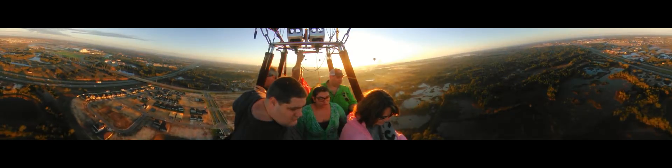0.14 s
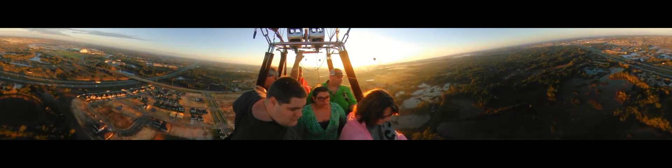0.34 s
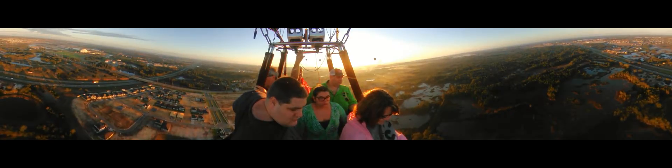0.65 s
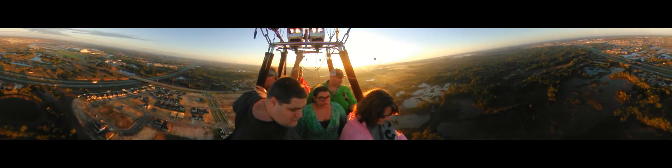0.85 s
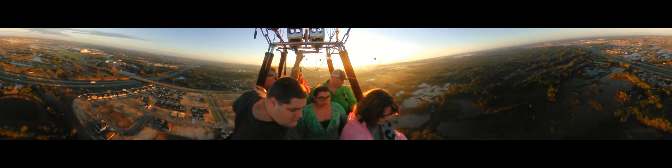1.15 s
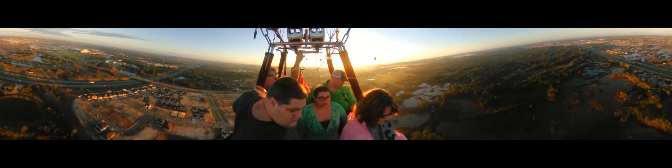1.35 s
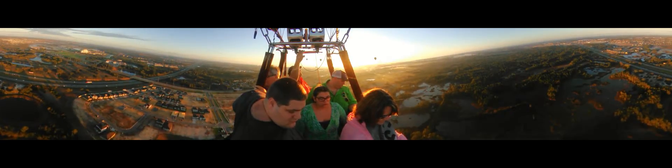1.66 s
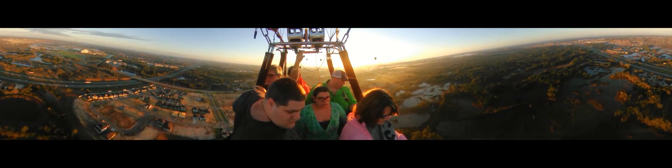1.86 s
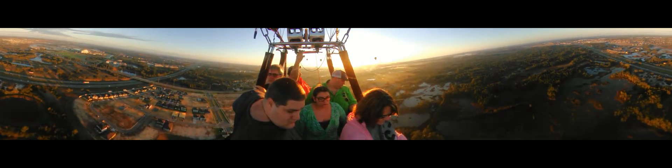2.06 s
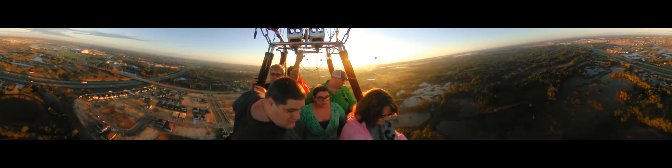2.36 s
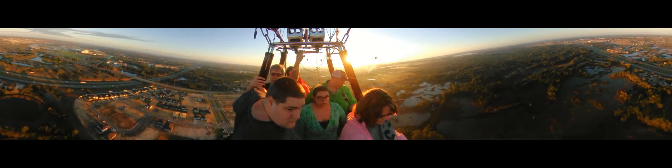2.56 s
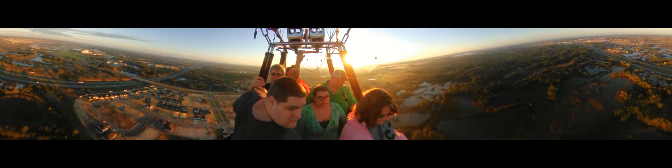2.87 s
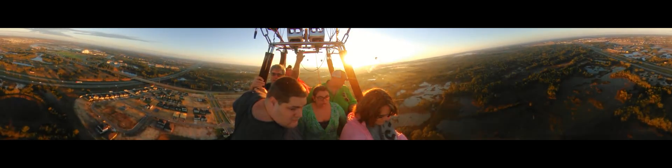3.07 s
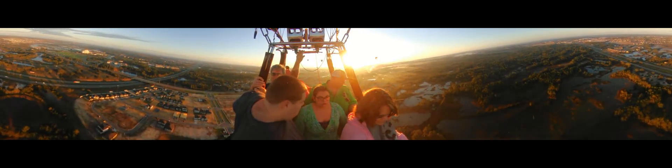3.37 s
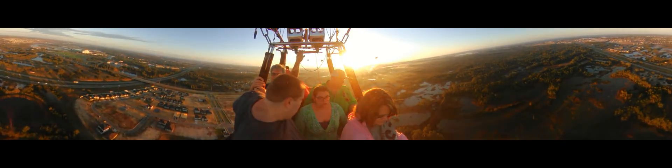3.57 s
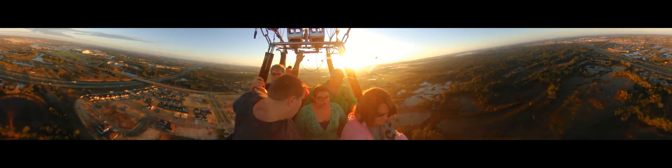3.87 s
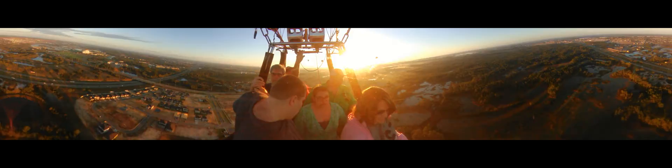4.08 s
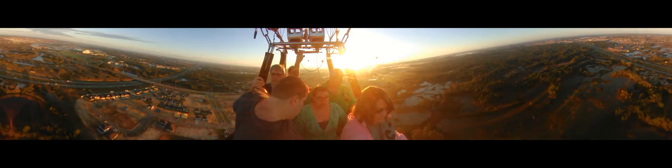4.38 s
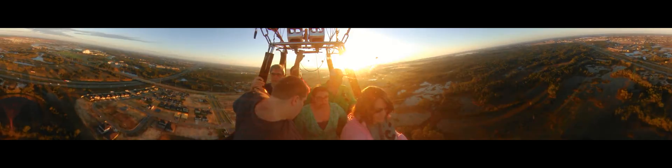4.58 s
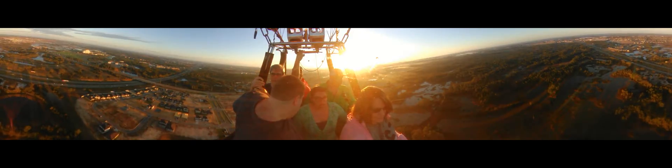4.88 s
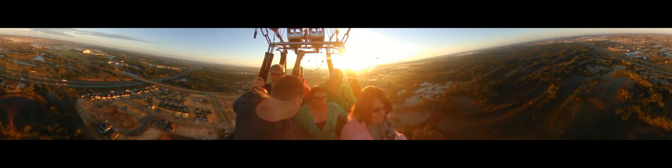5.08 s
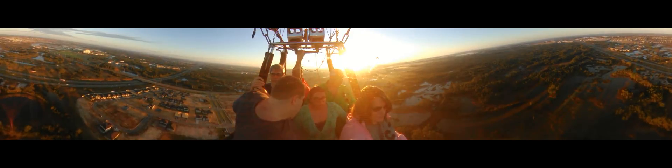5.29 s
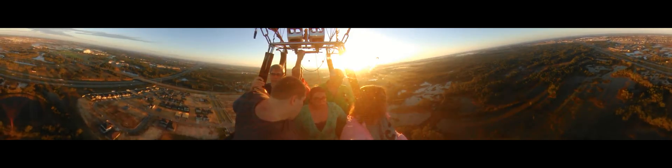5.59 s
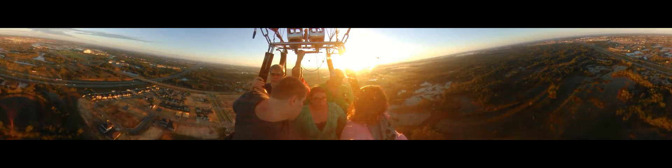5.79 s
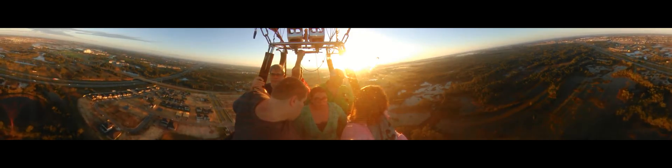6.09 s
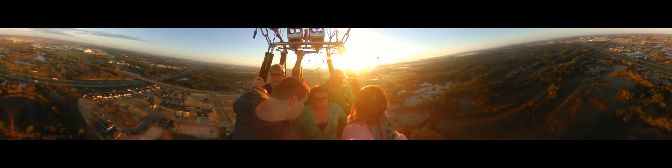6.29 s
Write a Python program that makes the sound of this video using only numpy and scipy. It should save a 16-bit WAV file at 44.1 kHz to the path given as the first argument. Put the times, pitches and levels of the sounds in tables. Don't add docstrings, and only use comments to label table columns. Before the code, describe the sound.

Outdoors in a balloon basket, a hissing burner blast stops, quiet flame and metallic bumps follow, then the burner reignites with a thump and overloading roar.

```python
import sys
import numpy as np
from scipy import signal
from scipy.fft import rfft, irfft
from scipy.io import wavfile
from scipy.ndimage import uniform_filter1d

SR = 44100
rng = np.random.default_rng(int(sys.argv[2]) if len(sys.argv) > 2 else 0)


def volts_from_decibels(level):
    exponent = np.asarray(level, float) / 20
    return 10 ** exponent


def dump_mix(stems):
    frames = np.atleast_2d(stems).T
    limited = np.clip(frames, -1, 1)
    pcm = np.round(limited * 32767).astype(np.int16)
    wavfile.write(sys.argv[1], SR, pcm)


N = 284004
T = np.arange(N) / SR
HZ = np.maximum(np.fft.rfftfreq(N, 1 / SR), 1)


def unit(x):
    return x / np.sqrt(np.mean(x ** 2))


def along(table, hz, column):
    table = np.array(table)
    return np.interp(np.log(hz), np.log(table[:, 0]), table[:, column])


def walk(rate):
    hold = int(SR / rate)
    steps = np.repeat(rng.standard_normal(N // hold + 1), hold)
    smooth = uniform_filter1d(uniform_filter1d(steps, hold), hold)
    return unit(smooth[:N])


def ring(modes, push, size):
    t = np.arange(size) / SR
    swell = 1 - np.exp(-(t / push) ** 2)
    total = np.zeros(size)
    for hz, db, t60 in modes:
        decay = np.exp(-np.log(1000) * t / t60)
        total += volts_from_decibels(db) * np.sin(2 * np.pi * (hz * t + rng.random())) * decay
    return swell * total


def add(out, sound, at_s):
    i = int(at_s * SR)
    n = min(sound.shape[-1], N - i)
    out[..., i:i + n] += sound[..., :n]


# frequency in Hz, lag of the right port in radians.
PORT_LAG = [(60, .02), (400, .1), (1700, .6), (4050, .6), (4500, 1.55), (6500, 1.6), (7300, 2.5),
            (8700, 2.4), (9400, 3.0), (14000, 3.2)]


def flame(colour, peaks, ports, registers_db, edges_hz, shared_db, own_db, eddy_db, eddy_rate):
    db = along(colour, HZ, 1)
    for peak_hz, width_hz, gain_db in peaks:
        db = db + gain_db / (1 + (2 * (HZ - peak_hz) / width_hz) ** 2)
    like = np.clip(along(ports, HZ, 1), 0, 1)
    lean = volts_from_decibels(along(ports, HZ, 2) / 2)
    mid, side = (rfft(rng.standard_normal(N)) * volts_from_decibels(db) * np.sqrt(1 + s * like) for s in (1, -1))

    late = np.exp(-1j * along(PORT_LAG, HZ, 1))
    pair = np.array([(mid + side) * lean, (mid - side) / lean * late])

    swell, flutter = walk(4.27), walk(eddy_rate)
    groups = np.zeros((len(registers_db), 2, N))
    for octave in np.arange(4.5, 14.1, .5):
        share = np.cos(np.pi * np.clip(np.log2(HZ) - octave, -.5, .5)) ** 2
        wobble_db = shared_db * swell + own_db * walk(12) + eddy_db * flutter
        register = np.searchsorted(edges_hz, 2 ** octave)
        groups[register] += irfft(pair * share, N) * volts_from_decibels(wobble_db)
    return sum(unit(group) * volts_from_decibels(level_db) for group, level_db in zip(groups, registers_db))


# time in seconds, swell in dB.
PILOT = [
    (.9, 1),
    (1.9, -.5),
    (2.5, -.5),
    (3.6, 2),
    (4.3, 3.5),
    (4.8, 5),
]
# frequency in Hz, level in dB per Hz.
PILOT_COLOUR = [(15, -52.5), (25, -38), (43, -5.5), (137, -3.5), (233, -8.5), (266, -7), (418, -7),
                (503, -8), (711, -8), (1710, -18.5), (2060, -21), (2480, -21), (4000, -23.5), (5070, -46),
                (14300, -55.5)]
# frequency in Hz, width in Hz, gain in dB.
PILOT_PEAKS = [(93, 48, 4), (815, 340, 2.5), (1770, 150, -4.5), (2040, 120, 6.5), (2610, 130, -5.5),
               (3680, 130, 4.5), (3760, 90, -9), (3900, 140, 2.5), (4500, 200, -0.5), (5160, 580, 6),
               (7400, 700, 3)]
# frequency in Hz, likeness from 0 to 1, left minus right in dB.
PILOT_PORTS = [(60, 0.92, 1), (151, 1, 0), (350, 0.42, 2.8), (700, 0.94, 1.2), (1080, 0.066, 0.3),
               (2300, 0.35, 3), (3800, 0.75, 1), (4500, 0.44, -1), (6500, 0.6, 2), (7300, .5, 1.5),
               (9000, 0.11, 2)]
# level in dB, share of the swell from 0 to 1.
PILOT_LAYERS = [
    (-43, 0.86),
    (-54.5, 0.82),
    (-68, 0.9),
]


def pilot():
    swell_db = np.interp(T, *np.transpose(PILOT))
    registers_db = [db + share * swell_db for db, share in PILOT_LAYERS]
    return flame(PILOT_COLOUR, PILOT_PEAKS, PILOT_PORTS, registers_db, (1300, 4600),
                 shared_db=.25, own_db=.7, eddy_db=.6, eddy_rate=90)


# start in seconds, ring in dB, low ring in dB against the ring,
# pitch of the struck bar in Hz, tick in dB against the ring.
KNOCKS = [(0.954, -65, -10, 330, 4), (1.257, -54, -8, 330, -3), (1.369, -55, -11.5, 340, -15),
          (1.551, -56, 1, 330, -9), (1.973, -58, -13, 330, -9), (2.275, -45.5, -1, 324, -20),
          (2.42, -49, -7, 270, -20), (2.655, -47, -1, 328, -19), (2.82, -45.5, 0, 268, -16),
          (2.905, -45, -2, 388, -12), (3.081, -63, -8, 350, -17), (3.26, -47, 4, 350, -11),
          (3.353, -53, -10, 480, -1), (3.476, -47.5, 2, 294, -9), (3.636, -52, -11, 400, -4),
          (3.818, -41.5, 6.5, 350, -9), (4.036, -67, -7.5, 450, 9), (4.128, -42, 1.5, 300, -13),
          (4.477, -36.5, -5, 395, -10), (4.741, -39, 2.5, 416, -14)]
# frequency in Hz, level in dB, time to fall 60 dB in seconds.
FRAME_LOW = [(127, 0, .6), (120, -7, .3), (154, -5, .4)]
# frequency in Hz, level in dB, time to fall 60 dB in seconds.
FRAME_HIGH = [(253, 10, 0.19), (268, -1, 0.57), (292, -12, 0.14), (324.4, 9, 0.27), (357, 2, 0.41),
              (421, 16, 0.093), (450, 4, 0.39), (480, 7, 0.27), (516, -7.5, 0.22)]
# frequency in Hz, level in dB, time to fall 60 dB in seconds.
BASKET = [(88, 0, 1.1), (110, -4, .35)]
# start in seconds, frequency in Hz, level in dB, time to fall 60 dB in seconds.
CLINKS = [(2.275, 316, -39, 0.49), (2.66, 327, -50, 0.45), (2.9, 331, -51, 0.31), (2.83, 268, -46, 0.55),
          (3.1, 349, -47.5, .6), (3.265, 268, -44, 0.67), (3.268, 357, -50, 0.58),
          (3.82, 1120, -46.5, 0.21), (3.83, 850, -42, .2), (3.86, 268, -36.5, 0.73),
          (4.14, 450, -41.5, 0.45), (4.26, 88, -42, 1.4)]
# start in seconds, frequency in Hz, level in dB, time to fall 60 dB in seconds.
PINGS = [
    (2.904, 8200, -62, .07),
    (2.908, 8480, -66, .06),
    (3.27, 8250, -62, .07),
    (3.272, 7980, -67, .06),
    (3.355, 2940, -54, .07),
    (4.755, 3090, -49, .1),
    (4.76, 3200, -52, .07),
    (4.765, 2990, -53, .06),
]
# frequency in Hz, share from 0 to 1.
RING_RIGHT = [(90, .87), (260, .15), (460, .1), (850, .6), (9000, .6)]
PUSH_S, HARDER_PER_DB = .017, 0.5
RISE_SHARE = 0.028


def knocks():
    out, size = np.zeros((2, N)), SR // 2
    t = np.arange(size) / SR
    dull = signal.butter(2, (700, 4300), "band", fs=SR, output="sos")
    wicker = signal.butter(2, (230, 950), "band", fs=SR, output="sos")
    for at, db, low_db, near_hz, tick_db in KNOCKS:
        push = PUSH_S * np.exp(-HARDER_PER_DB * max(tick_db, 0))

        near_bars = [(hz, g - 16 * abs(np.log2(hz / near_hz)), t60) for hz, g, t60 in FRAME_HIGH]
        thin = ring(near_bars, 1.0 * push, size)
        heavy = volts_from_decibels(low_db) * ring(FRAME_LOW, 1.44 * push, size)
        boom = volts_from_decibels(low_db - 4.5) * ring(BASKET, 1.2 * push, size)

        scuff = (1 - np.exp(-t / .003)) * (np.exp(-t / .009) + .4 * np.exp(-t / (1.5 * push)))
        rustle = rng.standard_normal((4, size))
        tick = signal.sosfilt(dull, (rustle[1:3] + 0.58 * rustle[0]) * scuff)
        creak = volts_from_decibels(14.5) * signal.sosfilt(wicker, rustle[3] * (t / push) * np.exp(-t / push))

        shake = (thin + creak) * np.array([[1.6], [-.3]]) + heavy * np.array([[-.2], [1.8]])
        add(out, volts_from_decibels(db + 4.0) * (shake + boom) + volts_from_decibels(db + tick_db + 12.5) * tick, at - .003)

    for at, hz, db, t60 in CLINKS + PINGS:
        clink = ring([(hz, db + 8, t60)], .003 + RISE_SHARE * t60, size)
        add(out, clink * np.array([[1], [along(RING_RIGHT, hz, 1)]]), at)
    return out


# start in seconds, first pitch in Hz, last pitch in Hz, level in dB,
# glide in seconds, time to the crest in seconds.
LIGHT_UP = (4.9, 150, 106, -6.5, .016, .021)


def light_up():
    at, first_hz, last_hz, db, glide, crest = LIGHT_UP
    t = np.clip(T - at, 0, 1)
    turns = last_hz * t + (first_hz - last_hz) * glide * (1 - np.exp(-t / glide))
    grow = (t / crest) ** 2 * np.exp(1 - (t / crest) ** 2)
    heave = volts_from_decibels(-8) * np.sin(2 * np.pi * 48 * t)
    return volts_from_decibels(db) * grow * (np.cos(2 * np.pi * turns) + heave)


# frequency in Hz, level in dB per Hz.
BLAST_COLOUR = [(15, -49), (25, -23.5), (78, -2), (126, -1.5), (266, -6), (329, -5), (490, -9.5),
                (639, -10), (1150, -21), (2980, -17), (3890, -18.5), (4560, -27.5), (5350, -29.5),
                (9350, -35.5), (14300, -38.5)]
# frequency in Hz, width in Hz, gain in dB.
BLAST_PEAKS = [(128, 32, 1.5), (338, 26, 2), (841, 70, 3.5), (2616, 31, -8), (4180, 170, 4.5),
               (4350, 290, -2), (5140, 180, 3), (7840, 500, 3), (9330, 510, -3.5), (14400, 1000, 3)]
# frequency in Hz, likeness from 0 to 1, left minus right in dB.
BLAST_PORTS = [(60, 1, 0), (300, .99, 0.64), (900, 1, 0.5), (1500, 0.89, 1.7), (2390, 0.77, 2.3),
               (3930, 0.96, 2), (4400, 0.2, -5), (5060, 1, 5), (6360, 0.55, 0.5), (9000, 0.33, 6),
               (13000, 0, 4.5)]
# level in dB, droop in dB per second, sag at the shut in dB, fall in dB per second.
DYING = [
    (-9, 0, 7.5, 320),
    (-18, 4.5, 10.5, 369),
    (-28, 7, 11, 400),
    (-26.5, 9, 16, 480),
]
# level in dB, still to grow in dB, short of that at the first crack in dB,
# surge in dB.
LIT = [
    (-6, 7, 13.5, -0.7),
    (-16, 5, 25, 0.7),
    (-26, 7.5, 34, 1.5),
    (-24.5, 6.5, 42, 1.5),
]
SHUT_S, OPEN_S, FULL_S = .742, 4.897, 4.955
SAG_S, BUILD_S, RISE_CURVE = 0.059, 0.14, 1.32
SURGE_S, SURGE_LASTS_S = 5.8, 0.22


def burner():
    sag = np.exp(np.minimum(T - SHUT_S, 0) / SAG_S)
    after = np.maximum(T - SHUT_S, 0)
    grow = np.exp(-np.maximum(T - FULL_S, 0) / BUILD_S)
    turn = (np.maximum(FULL_S - T, 0) / (FULL_S - OPEN_S)) ** RISE_CURVE
    surge = np.exp(-((T - SURGE_S) / SURGE_LASTS_S) ** 2)
    closed_db = 2500 * np.maximum(OPEN_S - T, 0)

    registers_db = []
    for (first_db, droop_db, sag_db, fall_db), (second_db, grow_db, short_db, surge_db) in zip(DYING, LIT):
        dying = first_db - droop_db * T - sag_db * sag - fall_db * after
        lit = second_db - grow_db * grow - short_db * turn + surge_db * surge - closed_db
        registers_db.append(np.maximum(dying, lit))
    return flame(BLAST_COLOUR, BLAST_PEAKS, BLAST_PORTS, registers_db, (1100, 4600, 7000),
                 shared_db=.3, own_db=.5, eddy_db=1.0, eddy_rate=150)


def scene():
    return pilot() + knocks() + light_up() + burner()


def roll_off(x):
    return signal.sosfilt(signal.butter(12, 14460, fs=SR, output="sos"), x)


def record(dry):
    ports = signal.sosfilt(signal.butter(2, 38, "high", fs=SR, output="sos"), dry)
    top, knee = .82, 4.0
    held = ports / (1 + np.abs(ports / top) ** knee) ** (1 / knee)
    finished = signal.sosfilt(signal.ellip(12, .3, 70, 14260, fs=SR, output="sos"), held)
    return roll_off(finished)


dry = scene()
out = record(dry)
dump_mix(out)
```